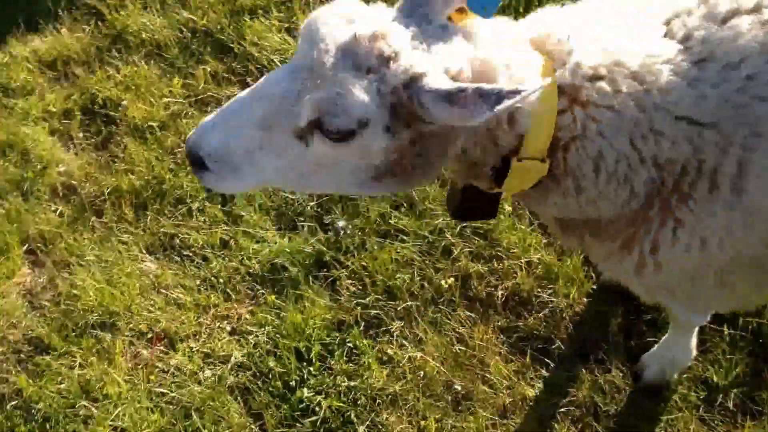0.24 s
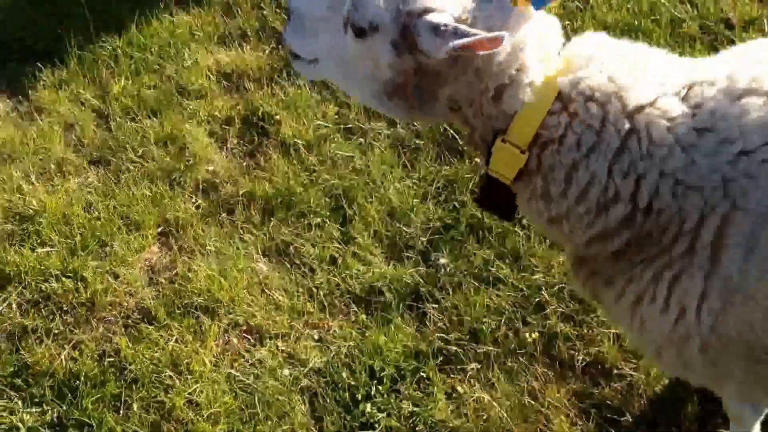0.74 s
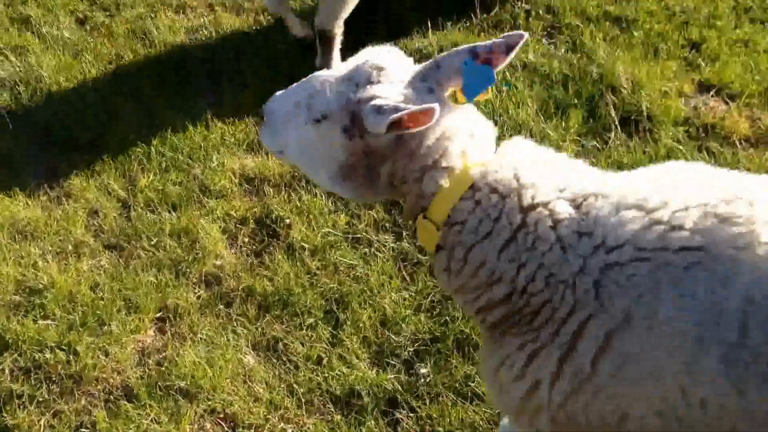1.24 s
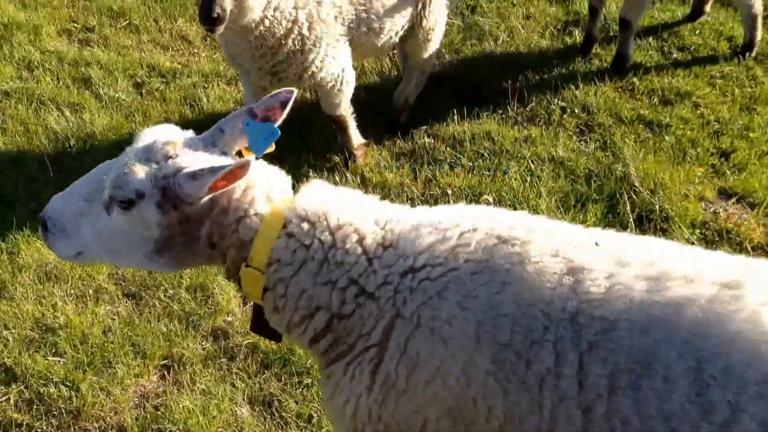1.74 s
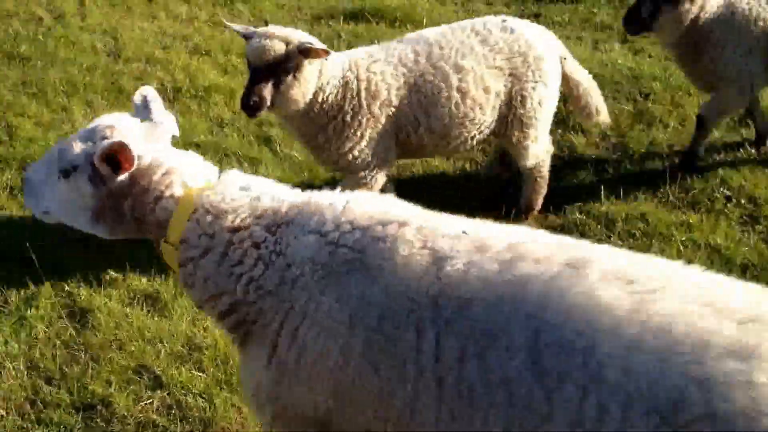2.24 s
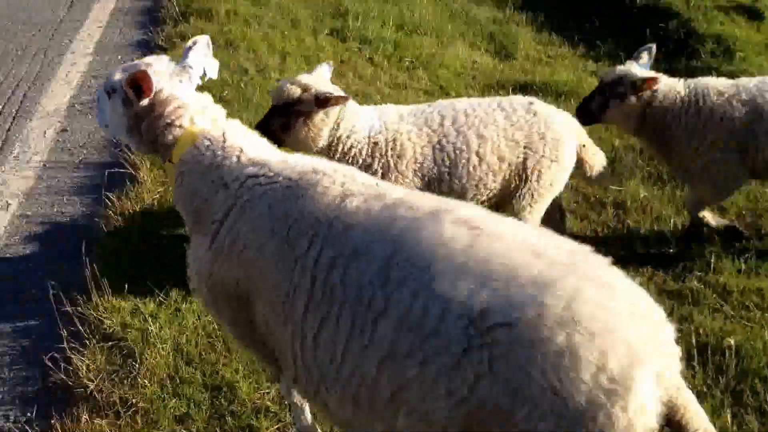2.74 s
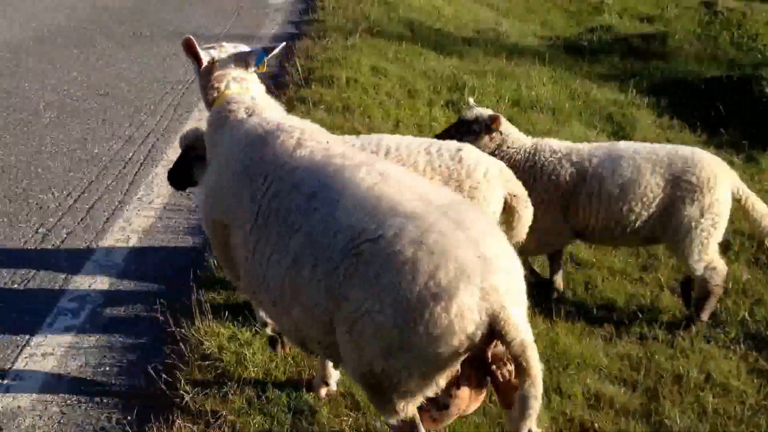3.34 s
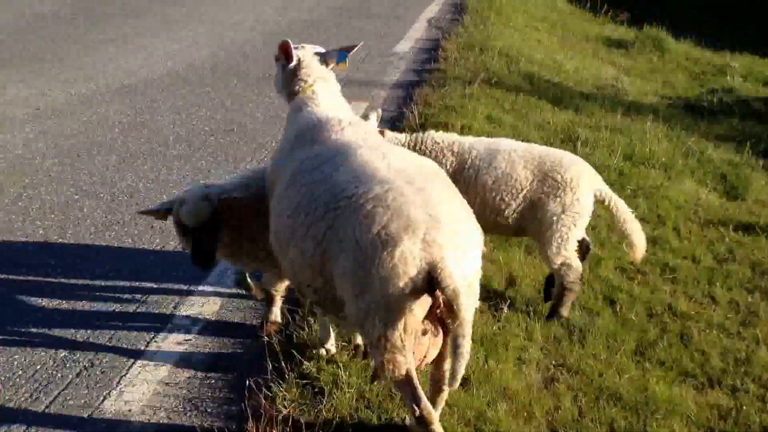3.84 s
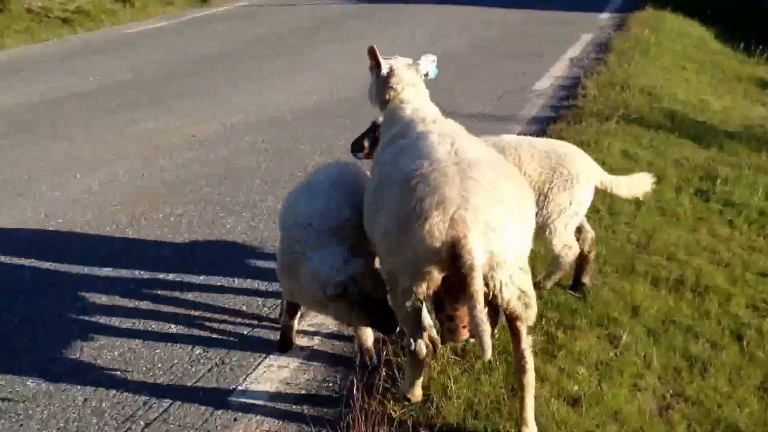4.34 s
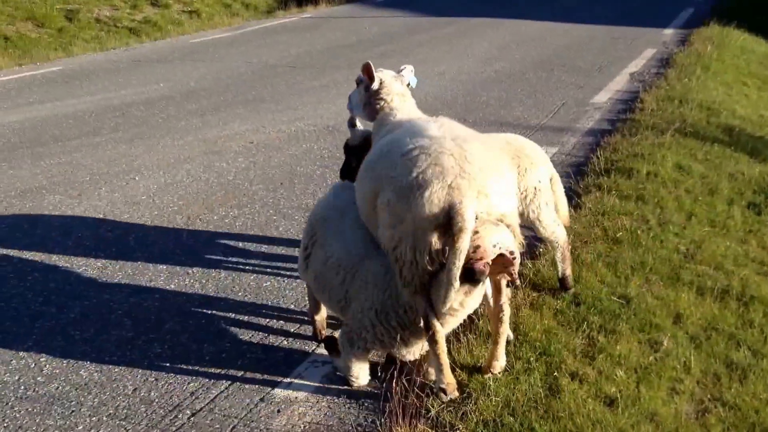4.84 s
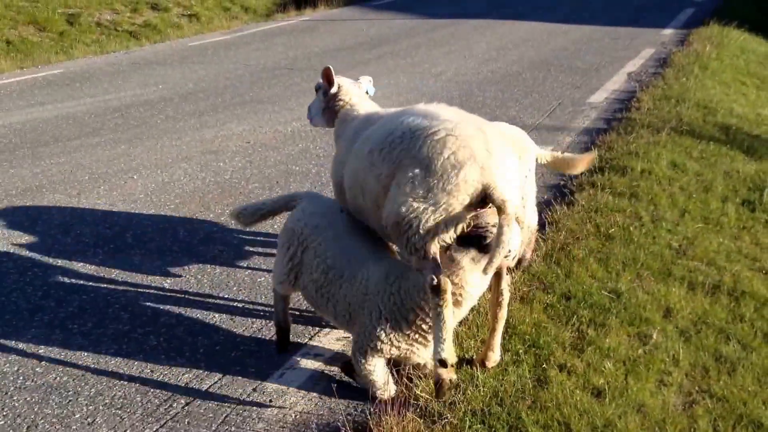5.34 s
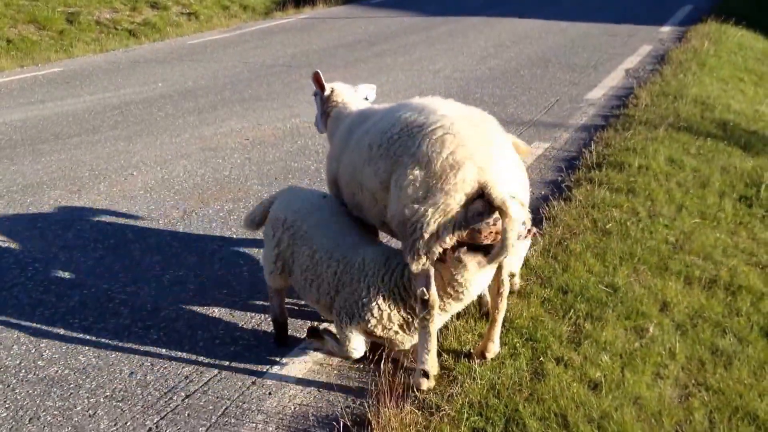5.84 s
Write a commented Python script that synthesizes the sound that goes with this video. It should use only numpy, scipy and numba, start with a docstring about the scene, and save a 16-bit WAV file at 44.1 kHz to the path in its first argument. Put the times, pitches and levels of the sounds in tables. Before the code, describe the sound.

An open grassy roadside, heard in mono with slightly dulled highest treble. A soft steady airy wash runs throughout, with wind thumping the microphone in low flutters, strong in the first 0.4 seconds and heaviest around 3.4-3.9. Wool and grass rustle and crackle, and small ticks of hooves and stems come and go. At 0.43 the ewe gives one brief, low, falling closed-mouth grunt. Her sheet-metal collar bell, barely touched at first, clinks from 0.7 in uneven, bouncing blows: short ringing tones with dry clacks, lively at 1.9-2.6, muffled clatter at 3.6-3.8, then its strongest clank at 4.1 and more to 5.35. A small bird chirps faintly near 0.8, 1.6, 2.3, 2.8 and 3.1. A deeper far bell sounds softly at 5.1 and 5.9; between them, at 5.52-5.60, everything cuts to silence. Wind and rustling finish at about 6.

```python
"""From the start, wind rumbles and thumps the microphone over a steady open-country wash (shaped noise).
A sheet-metal bell on a walking ewe's collar clinks and bounces throughout: fading tones plus noisy clacks.
Hooves tick and grass rustles (noise bursts and crackles); she soon grunts once, a falling, nearly pure tone.
A small bird then chirps five times with gliding tones. Late on, a far bell sounds twice (two fading tones);
between its strokes the sound drops out for a moment."""
import sys
import numpy as np
from scipy import signal
from scipy.io import wavfile
from scipy.ndimage import uniform_filter1d
from numba import njit

SR = 44100
rng = np.random.default_rng(int(sys.argv[2]) if len(sys.argv) > 2 else 0)


def persist_wave(psi):
    """Save psi, clipped to +-1, as 16-bit WAV."""
    counts = np.round(np.clip(psi, -1, 1) * 32767).astype(np.int16)
    wavfile.write(sys.argv[1], SR, np.atleast_2d(counts).T)


N = 267687  # samples, about 6.07 s


def gain_of(db):
    """Turn decibels into a multiplier for the wave."""
    return 10 ** (np.asarray(db) / 20)


def evened(x):
    """Scale a signal to an average (RMS) strength of one."""
    return x / np.sqrt(np.mean(x ** 2) + 1e-20)


def along(rows, t):
    """Read every column of a curve table at times t, joining its points with straight lines."""
    s, *columns = np.transpose(rows)
    return [np.interp(t, s, c) for c in columns]


def add(mix, s, sound):
    """Lay a sound into the mix from s seconds on."""
    part = mix[max(round(s * SR), 0):][:len(sound)]
    part += sound[:len(part)]


def noise(db_of, patchy_db, size):
    """Noise built from random short spectra, shaped by db_of(Hz, s), with drifting louder and softer patches."""
    frames = 4 * N // size + 5
    hz = np.fft.rfftfreq(size, 1 / SR)
    real, imaginary, patches = rng.standard_normal((frames, len(hz), 3)).T
    patches = uniform_filter1d(patches, size=8, axis=0)
    patches = evened(uniform_filter1d(patches, size=8, axis=1))
    frame_s = np.arange(frames) * size / 4 / SR
    level_db = db_of(hz[:, None], frame_s) + patchy_db * patches
    spectra = (real + 1j * imaginary) * gain_of(level_db)
    return signal.istft(spectra, nperseg=size, noverlap=3 * size // 4)[1][:N]


def colour(points, hz):
    """Read a (pitch, level) table on a logarithmic pitch scale."""
    f, db = np.transpose(points)
    return np.interp(np.log(hz + 1), np.log(f + 1), db)


def burst(hz, ratio, t60, draw):
    """A dying noise burst between hz / ratio and hz * ratio; it falls by 60 dB in t60 seconds."""
    edges = np.clip([hz / ratio, hz * ratio], 100, SR / 2.2)
    band = signal.lfilter(*signal.butter(2, edges, "band", fs=SR), draw)
    t = np.arange(draw.shape[-1]) / SR
    fall = gain_of(-60 * t / max(t60, .002))
    return evened(band) * fall * (1 - np.exp(-t / 0.0006))


# tone of the open country: (pitch_hz, relative level_db per Hz)
FIELD_COLOUR = [(60, -83.5), (140, -3.5), (250, -3.5), (1000, -7), (2750, -19.5), (5000, -17), (10000, -26),
                (15000, -23)]
FIELD_DB, FIELD_PATCHY_DB = -63, 1.5


def field():
    """The steady wash of open country: many small sounds blend into shaped noise."""
    wash = noise(lambda hz, s: colour(FIELD_COLOUR, hz) + 0 * s, FIELD_PATCHY_DB, size=1024)
    return gain_of(FIELD_DB) * evened(wash)


# gusts that shed a run of eddies on the microphone: (start_s, length_s, level_db at the start before scatter)
WIND_GUSTS = [(.02, .01, -48), (0.064, .061, -44), (0.187, .044, -36), (.244, 0, -46),
              (0.371, 0.0078, -41.5), (0.864, .035, -49), (0.922, 0.05, -43), (1.192, 0.044, -43.5),
              (1.419, 0.0026, -45.5), (1.598, 0.051, -42), (1.846, 0.0078, -46.5), (2.922, 0.054, -48.5),
              (3.2, 0.066, -56.5), (3.433, 0.022, -44.5), (3.485, 0.031, -39.5), (3.581, 0.024, -29),
              (3.613, 0.0048, -43), (3.691, .066, -39), (3.778, 0.0075, -36.5), (3.813, 0.024, -46.5),
              (3.891, 0.0089, -49.5), (4.718, 0, -46.5), (4.893, 0.01, -44), (5.103, 0.00061, -45),
              (5.372, 0.012, -52.5), (5.829, 0.0056, -35), (5.852, 0.11, -54), (5.94, 0.0079, -48),
              (6.004, 0.0077, -50)]
EDDY_GAP_S, EDDY_JITTER_S = 0.016, .003
GUST_FADE_DB_PER_S, EDDY_SCATTER_DB = -107, 2.4
EDDY_HZ, EDDY_HZ_PER_DB = 146.8, 3  # middle pitch at -42 dB; stronger gusts thump higher
EDDY_SPREAD = .17  # random spread of the natural log of the pitch
EDDY_EDGE = 0.17  # share of the overtone that sharpens an eddy


def eddies():
    """Each gust sheds eddies at a near-steady pace, fading as it passes; each thumps for about two cycles."""
    out, lag = np.zeros(N), np.arange(-800, 800) / SR
    draws = rng.standard_normal((len(WIND_GUSTS), 3, 8))
    phases = rng.random((len(WIND_GUSTS), 8))
    for (s, length, db), draw, phase in zip(WIND_GUSTS, draws, phases):
        for k in range(min(round(length / EDDY_GAP_S) + 1, len(phase))):
            since = k * EDDY_GAP_S + EDDY_JITTER_S * draw[0, k]
            middle_hz = EDDY_HZ + EDDY_HZ_PER_DB * (db + 42.0)
            hz = middle_hz * np.exp(EDDY_SPREAD * draw[1, k])
            level_db = db + GUST_FADE_DB_PER_S * since + EDDY_SCATTER_DB * draw[2, k]
            angle = 2 * np.pi * (lag * hz + phase[k])
            wave = np.sin(angle) + EDDY_EDGE * np.cos(2 * angle)
            thump = np.exp(-(lag * hz / 0.79) ** 2) * wave
            add(out, s + since + lag[0], np.sqrt(2) * gain_of(level_db) * thump)
    return out


# strength of the wind's rumble before lumps and bass cut: (time_s, level_db)
RUMBLE_LEVEL = [(0, -53.5), (.27, -74), (.6, -70.5), (.85, -65), (1.9, -59.5), (2.0, -89), (2.88, -86),
                (2.93, -49.5), (3.05, -65), (3.4, -65.5), (3.45, -50.5), (3.9, -53.5), (4.0, -85.5),
                (4.4, -67), (4.5, -61.5), (5.5, -63.5), (5.8, -68), (6.07, -68)]
# tone of the rumble before the bass cut: (pitch_hz, relative level_db per Hz)
RUMBLE_COLOUR = [(30, -51), (60, 0), (100, 4), (170, 3), (280, -6.5), (700, -81.5)]


def wind():
    """Wind on the microphone: a lumpy low rumble, and single eddies that thump the membrane."""
    t = np.arange(N) / SR
    rumble = evened(noise(lambda hz, s: colour(RUMBLE_COLOUR, hz) + 0 * s, 6.4, size=2048))
    lumps = evened(signal.lfilter(*signal.butter(1, 25, fs=SR), rng.standard_normal(N)))
    out = rumble * gain_of(along(RUMBLE_LEVEL, t)[0] + 3.25 * lumps)
    ragged = evened(signal.lfilter(*signal.butter(2, 250, fs=SR), rng.standard_normal(N)))
    out += eddies() * (1 + 0.2 * ragged)
    return signal.lfilter(*signal.butter(3, 66, "high", fs=SR), out)  # the microphone sheds deep bass


# tones of the far bell: (pitch_hz, level_db, t60_s, the time to fall by 60 dB)
FAR_BELL_TONES = [(1030, -1, 0.4), (2320, -17, 0.092)]
# strokes of the far bell: (start_s, level_db added to each tone)
FAR_BELL_STROKES = [(5.075, -54), (5.863, -55)]


def far_bell():
    """A deeper bell further along the verge: each stroke starts two tones that die away."""
    out, t = np.zeros(N), np.arange(SR // 3) / SR
    tone = 0
    for hz, db, t60 in FAR_BELL_TONES:
        tone = tone + gain_of(db - 60 * t / t60) * np.sin(2 * np.pi * hz * t)
    for s, db in FAR_BELL_STROKES:
        add(out, s, gain_of(db) * tone * (1 - np.exp(-t / 0.0015)))
    return out


# rustling of wool and grass, before the trim below: (time_s, low_db near 800 Hz, high_db near 4.5 kHz)
RUSTLE_LEVELS = [(0, -65.5, -63.5), (.2, -48.5, -62.5), (.45, -83.5, -68), (1.0, -57.5, -67.5),
                 (1.15, -48, -64), (1.4, -62.5, -66), (2.5, -57.5, -62), (3.3, -59, -68), (4.05, -59, -63),
                 (4.3, -62, -62.5), (4.72, -64, -68), (5.05, -57, -61.5), (5.5, -69, -71.5),
                 (5.75, -64.5, -63), (5.875, -65, -50.5), (5.895, -71, -61), (6.07, -77, -122)]
CRACKLES_PER_S, RUSTLE_PATCHY_DB = 730, 2.5


def rustle():
    """Wool and grass rub in many fine crackles, which roughen a noise of changing brightness."""
    def rustle_db(hz, s):
        low_db, high_db = along(RUSTLE_LEVELS, s)
        share = np.clip(np.log(np.maximum(hz, 1) / 800) / np.log(4450 / 800), 0, 1)
        treble_db = -7.5 * np.log2(np.maximum(hz / 5000, 1))
        bass_db = -9 * np.log2(np.maximum(350 / (hz + 1), 1))
        return low_db + share * (high_db - low_db) + treble_db + bass_db

    sizes = gain_of(2.5 * np.minimum(rng.exponential(1, N), 4))
    crackles = sizes * (rng.random(N) < CRACKLES_PER_S / SR)
    tails = signal.oaconvolve(crackles, np.exp(-np.arange(600) / 60.))[:N]
    grain = evened(2.0 + tails)
    return gain_of(-13.5) * grain * noise(rustle_db, RUSTLE_PATCHY_DB, size=256)


# ticks of hooves and grass stems, plus the click of the bell blow at 4.523 s: (time_s, level_db, pitch_hz at
# the middle of the band)
GRASS_TICKS = [(0.192, -41.5, 1580), (0.304, -43.5, 1790), (0.365, -46, 1650), (0.412, -45.5, 1040),
               (0.575, -45.5, 950), (0.943, -38, 920), (0.975, -47.5, 2160), (1.048, -37, 1440),
               (1.139, -34, 1420), (1.162, -40, 1090), (1.238, -46.5, 2650), (1.291, -44, 1500),
               (1.444, -38.5, 1640), (1.452, -45.5, 2800), (1.685, -39.5, 2060), (2.141, -39, 520),
               (2.357, -48, 4400), (2.403, -50, 4320), (2.734, -43, 596), (3.098, -46, 5230),
               (3.106, -42.5, 5940), (3.111, -47, 3160), (3.527, -44.5, 4840), (3.949, -49.5, 2400),
               (3.992, -43, 2320), (4.048, -39, 2040), (4.073, -47, 3660), (4.523, -42.5, 2670),
               (4.657, -44.5, 2420), (4.668, -41, 400), (4.683, -43.5, 4170), (4.683, -42.5, 720),
               (4.704, -43.5, 536), (4.749, -43.5, 1680), (4.764, -41, 450), (4.783, -45.5, 610),
               (5.021, -38.5, 610), (5.047, -46, 550), (5.235, -41.5, 3750), (5.945, -47, 1194),
               (5.975, -42, 550), (5.973, -44, 2940)]
TICK_T60_S = .018  # limit for very high ticks; lower ones last longer
CRUMB_DB = 3  # unevenness inside a tick


def ticks():
    """Hooves and stems snap in short noise bursts that crumble into a few grains; one such burst is the click
    of a bell blow."""
    out = np.zeros(N)
    draws = rng.standard_normal((len(GRASS_TICKS), 2, 2000))
    for (s, db, hz), draw in zip(GRASS_TICKS, draws):
        crumbs = gain_of(CRUMB_DB * evened(uniform_filter1d(draw[1], size=50)))
        t60 = TICK_T60_S * np.sqrt(1 + 800 / hz)
        add(out, s - .001, gain_of(db) * burst(hz, 1.384, t60, draw[0] * crumbs))
    return out


# the two voices of one chirp: (time_s in the chirp, pitch_hz before the factor, relative level_db)
CHIRP_VOICES = [
    [(0, 3240, 2), (.014, 4850, 11), (.024, 5130, 9), (.04, 4480, 16)],
    [(.022, 5600, -12), (.04, 5330, 8.5), (.06, 4980, 15.5), (.074, 4300, 15)],
]
# when the bird chirps: (start_s, level_db added to the voices, pitch factor)
BIRD_CHIRPS = [(.792, -65, 1.02), (1.588, -67.5, 1.02), (2.258, -67.5, 0.99), (2.81, -72, 0.99),
               (3.104, -72, 1.05)]


def bird():
    """A chirp in two overlapping voices, a quick arch and a falling whistle, slightly hoarse."""
    out = np.zeros(N)
    for (s, db, factor), draw in zip(BIRD_CHIRPS, rng.standard_normal((len(BIRD_CHIRPS), 4000))):
        for voice in CHIRP_VOICES:
            t = np.arange(voice[0][0], voice[-1][0], 1 / SR)
            hz, shape_db = along(voice, t)
            hoarse_db = 3.2 * evened(uniform_filter1d(draw, size=120))[:len(t)]
            tone = np.sin(2 * np.pi * factor * np.cumsum(hz) / SR)
            tone *= signal.windows.tukey(len(t), .2)
            add(out, s + t[0], gain_of(db + shape_db + hoarse_db) * tone)
    return out


# the ewe's grunt: (time_s, level_db added to the overtones, pitch_hz)
EWE_GRUNT = [(0.426, -53, 207), (.46, -57, 186.2), (.5, -51, 183), (.525, -56, 176), (.545, -68, 168)]
# strength of the base tone and its overtones at 2 and 3 times the pitch: (relative level_db)
GRUNT_OVERTONES = [4.5, -17, -10]


def ewe():
    """A short closed-mouth grunt: a falling base tone with two weak overtones, nearly pure."""
    out, t = np.zeros(N), np.arange(EWE_GRUNT[0][0], EWE_GRUNT[-1][0], 1 / SR)
    db, hz = along(EWE_GRUNT, t)
    turns = np.cumsum(hz) / SR
    tone = 0
    for k, overtone_db in enumerate(GRUNT_OVERTONES):
        tone = tone + gain_of(overtone_db) * np.sin(2 * np.pi * (k + 1) * turns)
    add(out, t[0], gain_of(db) * tone * signal.windows.tukey(len(t), .2))
    return out


@njit
def ring(starts, fresh, poles, turn, fade, kept):
    """After each blow the new ringing of every mode takes over from the old within a few cycles."""
    out = np.zeros(starts[-1])
    for m in range(len(turn)):
        new, old, share = 0j, 0j, 0.
        for k in range(len(starts) - 1):
            old = new * (1 - share) + old * share
            size = max(abs(fresh[k, m]), kept[m] * abs(old))
            # a light touch barely shifts the phase
            aim = old + fresh[k, m] * max(1 - abs(old) / size, 1e-3)
            new, share = size * aim / abs(aim), 1.
            for n in range(starts[k], starts[k + 1]):
                out[n] += (new * (1 - share) + old * share).imag
                new, old = new * poles[k, m], old * turn[m]
                share = max(share * fade[m], 1e-12)
    return out


# pitches of the bell's modes, its natural ways of ringing, before movement shifts them: (pitch_hz)
MODE_PITCHES = [1317, 1240, 1470, 2446, 2934, 3014, 3349, 5261, 8518, 3885, 4953, 5723, 6692, 6742, 7650,
                8076, 9010, 9380, 10665, 11052, 11232, 12300, 12750, 13400, 13540, 15030, 5110, 7160, 8800,
                9760]
# the same modes in the same order: (wall family 0-12, level_db in the family, t60_s at damping 1);
# a family shares the still lines of the wall, so one blow drives it alike
MODE_SETTINGS = [(0, 0.5, 0.23), (0, -0.5, 0.033), (0, -10, 0.017), (1, -2, 0.32), (9, -3, 0.82),
                 (2, 5.5, 0.2), (3, 1, 0.13), (4, -6, 0.15), (4, -5.5, 0.071), (5, 5, 0.19), (6, 1, 0.2),
                 (6, 2, 0.11), (7, -4, 0.13), (7, 1, 0.17), (8, -1.5, 0.073), (10, -4, 0.19),
                 (8, -5, 0.098), (8, -8.5, 0.11), (8, -9, 0.19), (8, -10.5, 0.15), (11, 0.5, 0.13),
                 (8, -6.5, 0.093), (12, -11.5, .1), (12, -5.5, 0.08), (8, -10, .09), (12, -9, 0.09),
                 (8, -2.5, 0.095), (8, -12.5, 0.14), (8, -7, 0.11), (8, -18, 0.048)]
# clapper blows: (start_s, low_family_db, upper_families_db, place across the wall, place along the wall,
# softness, damping by the wool as a factor on decay rate); places and softness run about -1 to 1
CLAPPER_BLOWS = [(0.043, -46.5, -64, -0.049, -0.0093, -0.24, 1.05),
                 (0.695, -33, -58, 0.18, -0.24, 0.69, 0.82), (0.849, -37.5, -69, 0.47, 0.5, 0.067, 0.86),
                 (1.0564, -27.5, -54.5, -0.075, 0.081, 0.49, 1.9),
                 (1.0685, -40, -54, 0.28, 0.63, -0.19, 0.87), (1.298, -38.5, -53.5, -0.44, 0.31, 0.18, 2.2),
                 (1.3084, -34, -48.5, -0.52, -0.0047, 0.014, 0.86),
                 (1.6425, -31, -56.5, -0.048, 0.17, 0.07, 1.3),
                 (1.6812, -43.5, -67.5, 0.08, 0.6, 0.36, 0.82),
                 (1.9274, -25, -51.5, -0.00055, 0.068, 0.027, 0.86),
                 (2.113, -23, -52, -1.18, -1.3, -0.14, 1), (2.1288, -27, -48.5, -0.81, -0.8, 0.15, 0.75),
                 (2.169, -27, -56.5, 0.29, -0.091, 0.73, 0.86),
                 (2.248, -31.5, -59, 0.16, 0.038, 0.39, 0.91),
                 (2.4649, -49, -57.5, -0.082, 0.78, -0.76, 1.3),
                 (2.5128, -38, -61.5, 0.24, 0.22, 0.58, 1.1),
                 (2.534, -43, -62.5, 0.031, -0.068, 0.075, 0.86),
                 (2.6242, -31, -60.5, 0.18, -0.39, -0.29, 1.17),
                 (2.646, -39.5, -58.5, -0.13, -0.004, 0.19, 1.94),
                 (2.789, -54.5, -72, -0.17, -0.17, -0.15, 0.88),
                 (2.9009, -36, -57, 0.16, 0.067, -0.29, 0.97), (2.944, -38, -64, 0.16, -0.21, -0.3, 1.2),
                 (2.958, -47, -67, 0.48, 0.33, -0.27, 1.2), (2.987, -49, -70, 0.14, 0.11, -0.34, 1),
                 (3.008, -52.5, -71.5, 0.28, 0.36, -0.057, 0.9),
                 (3.2052, -36, -54, -0.13, 0.22, 0.28, 0.74), (3.299, -61, -65, -0.77, -0.19, -0.31, 1.2),
                 (3.355, -66, -72, 0.17, 0.29, 0.22, 0.24), (3.409, -50.2, -67.5, 0.21, 0.27, -0.29, 0.46),
                 (3.478, -42.5, -77.5, 0.28, 0.17, 0.11, 1.45),
                 (3.578, -25, -69.5, -0.57, -1.04, 0.46, 1.82), (3.671, -56, -84, -0.21, -0.13, 0.22, 0.73),
                 (3.693, -25, -53.5, 0.05, -0.79, 0.31, 1.76),
                 (3.723, -34.5, -59, -0.12, -0.021, -0.055, 2.5),
                 (3.7568, -43, -59.5, 0.072, 0.21, -0.52, 1.7),
                 (3.8255, -36, -67, -0.044, -0.065, -0.58, 1.15),
                 (3.8967, -48.5, -65, 0.084, 0.97, -1.1, 0.28),
                 (3.932, -63, -71, -0.43, 0.041, -0.5, 0.034),
                 (4.1146, -18, -48.5, -0.099, 0.39, -0.36, 1.63),
                 (4.1725, -29.5, -61.5, 0.57, 0.39, -0.56, 1.8),
                 (4.194, -45, -57, -0.31, 0.27, -0.54, 0.73), (4.3226, -32, -63, -0.064, 0.54, -0.01, 0.7),
                 (4.367, -23.5, -57, -0.2, -0.14, -0.29, 0.72),
                 (4.42, -29.5, -63, -0.13, 0.084, -0.31, 1.32), (4.524, -41, -65.5, 0.3, 0.047, 0.54, 0.58),
                 (4.7633, -46, -70, -0.13, 0.29, 0.056, 1.9), (4.8776, -36, -62, -0.1, 0.68, -0.35, 1.13),
                 (4.9642, -37, -55, -0.8, -0.47, -0.21, 0.57),
                 (4.983, -37, -56, -0.25, -0.036, 0.081, 0.76),
                 (5.0333, -40, -61, -0.13, -0.25, 0.18, 0.99),
                 (5.2728, -49.5, -63.5, -0.27, 0.1, -1.07, 0.83),
                 (5.3498, -35, -55, -0.67, -0.67, -0.088, 0.99)]
# upper families 1 to 12: (offset_db from the blow's upper level, slope_db per unit of place across,
# slope_db per unit of place along, slope_db per unit of softness)
UPPER_FAMILIES = [(-6.5, -27, 23, 9), (-0.1, 14, -9.5, -5), (-1, -5.5, -7, -0.5), (-1, -17, -4, 23),
                  (5, 16, 12.5, 2.5), (2.5, 13.5, -7.5, -7), (4, 1, -3, -14.5), (-1.5, 3, -0.5, -8),
                  (-0.6, 9.5, -0.5, 2), (0.5, -3.5, 5.5, -10.5), (-2.6, 7.5, 6.5, -13), (3.5, 3, 1.5, -4.5)]
# movement of the bell towards the microphone: (time_s, speed_m_per_s)
BELL_APPROACH = [(1.9, .25), (2.9, -.45), (4.2, -.3), (4.9, .15)]
SOUND_M_PER_S = 343
RISE_CYCLES = 3.17  # cycles for the old ringing's share to fall to about a third
HOLD_T60_S = .55  # modes longer than about this ring on through a lighter blow
SCATTER_DB = 12  # largest random change of a thin treble mode, up or down
PARTNER_TURN = 0.44  # part of a cycle between the fresh pushes to the low pair
SWING_S, SWING_DB_PER_KHZ = .12, 0.24  # a clapper that swings freely this long strikes brighter
SHADOW_DB_PER_KHZ_S = -0.07  # the fleece dulls the treble as the ewe turns away
CHATTER_DB, CHATTER_HZ = 1, 154  # depth per unit of damping above 0.7; top of the shake's pitch
RATTLE_DB = 2  # depth per unit of damping above 0.3, up to one unit
CLACK_DB, CLACK_T60_S = -10, 0.097  # against the combined families 2 to 12
CRACK_DB, CRACK_T60_S = -8, .009  # likewise, at a medium swing
KNOCK_HZ, KNOCK_DB, KNOCK_T60_S = 1560, -35.5, 0.11  # against the low family, at damping 1


def bell():
    """Each blow resets how strongly every mode rings; the wool damps it until the next blow."""
    hz, blows = np.array(MODE_PITCHES), np.array(CLAPPER_BLOWS)
    family, db, t60 = np.transpose(MODE_SETTINGS)
    family = np.round(family).astype(np.int64)
    blow_s, damping = blows[:, :1], abs(blows[:, -1:])

    # place and softness choose the families
    mean_db, *slopes_db = np.transpose(UPPER_FAMILIES)
    upper_db = blows[:, 2:3] + mean_db + blows[:, 3:6] @ np.array(slopes_db)
    family_db = np.hstack([blows[:, 1:2], upper_db])
    chance = rng.random((len(blows), 2, len(hz)))
    # the low pair starts opposed, so the tone swells in
    chance[:, 1, 1] = chance[:, 1, 0] + PARTNER_TURN
    # the thin treble modes vary most
    scatter_db = SCATTER_DB * (2 * chance[:, 0] - 1) * (family == 8)
    # rebounds land softly
    swing = np.minimum(np.diff(blow_s, axis=0, prepend=-1) / SWING_S, 1) - .5
    shadow_db_per_khz = SHADOW_DB_PER_KHZ_S * (blow_s - N / SR / 2)
    treble_db = (shadow_db_per_khz + SWING_DB_PER_KHZ * swing) * hz / 1000
    level_db = family_db[:, family] + db + scatter_db + treble_db
    fresh = np.sqrt(2) * gain_of(level_db) * np.exp(2j * np.pi * chance[:, 1])

    # the wide low modes feel the wool's damping in full, the upper modes only a softened share of it
    felt = np.where(family == 0, damping, damping ** .4)
    doppler = 1 + along(BELL_APPROACH, blow_s)[0] / SOUND_M_PER_S
    poles = np.exp(2j * np.pi * hz * doppler / SR) * gain_of(-60 * felt / t60 / SR)
    turn = np.exp(2j * np.pi * hz / SR)
    fade = np.exp(-hz / RISE_CYCLES / SR)
    kept = 1 - np.exp(-(t60 / HOLD_T60_S) ** 2)
    starts = np.append(np.round(blows[:, 0] * SR), N).astype(np.int64)
    out = ring(starts, fresh, poles, turn, fade, kept)

    # a firmly damped bell rings unevenly, and the clapper rattles on the wall
    pressed = np.repeat(np.append(0, damping), np.diff(np.append(0, starts)))
    shake = evened(signal.lfilter(*signal.butter(2, CHATTER_HZ, fs=SR), rng.standard_normal(N)))
    out *= gain_of(CHATTER_DB * np.maximum(pressed - 0.7, 0) * shake)
    upper = signal.sosfiltfilt(signal.butter(4, 2000, "high", fs=SR, output="sos"), out)
    rattle_db = RATTLE_DB * np.clip(pressed - 0.3, 0, 1) * shake[::-1]
    out += upper * (gain_of(rattle_db) - 1)
    return out + strikes(blows[:, 0], family_db, swing, damping)


def strikes(blow_s, family_db, swing, damping):
    """Countless short modes merge in a clack with a metal-on-metal crack; a held bell knocks harder."""
    out = np.zeros(N)
    draws = rng.standard_normal((len(blow_s), 3000))
    clacks = burst(2450, 3.1, CLACK_T60_S, draws)
    clacks = clacks + 0.5 * burst(7900, 1.5, CLACK_T60_S, draws[:, ::-1])
    cracks = burst(10500, 1.9, CRACK_T60_S, np.roll(draws, 2, axis=0))
    clacks = clacks + gain_of(CRACK_DB - CLACK_DB + 10 * swing) * cracks
    knocks = burst(KNOCK_HZ, 1.23, KNOCK_T60_S, np.roll(draws, 1, axis=0)) * damping ** 2
    for s, levels_db, clack, knock in zip(blow_s, family_db, clacks, knocks):
        size = np.linalg.norm(gain_of(levels_db[2:])) * gain_of(CLACK_DB)
        add(out, s, size * clack + gain_of(levels_db[0] + KNOCK_DB) * knock)
    return out


def scene():
    """All the sounds together, from the background to the bell, in one channel."""
    background = field() + wind() + far_bell()
    nearby = rustle() + ticks() + bird() + ewe()
    return (background + nearby + bell())[None]


# the moment without sound: (start_s, end_s)
SILENT_MOMENT = (5.523, 5.602)
EDGE_HZ = 15350  # the treble ends around here


def record(dry):
    """The signal drops out briefly; then a filter takes away the highest treble."""
    t = np.arange(N) / SR
    live = dry * ((t < SILENT_MOMENT[0]) | (t > SILENT_MOMENT[1]))
    band_limit = signal.firwin(511, EDGE_HZ, window=("kaiser", 9), fs=SR)
    return signal.oaconvolve(live, band_limit[None], "same")


dry = scene()
out = record(dry)
persist_wave(out)
```